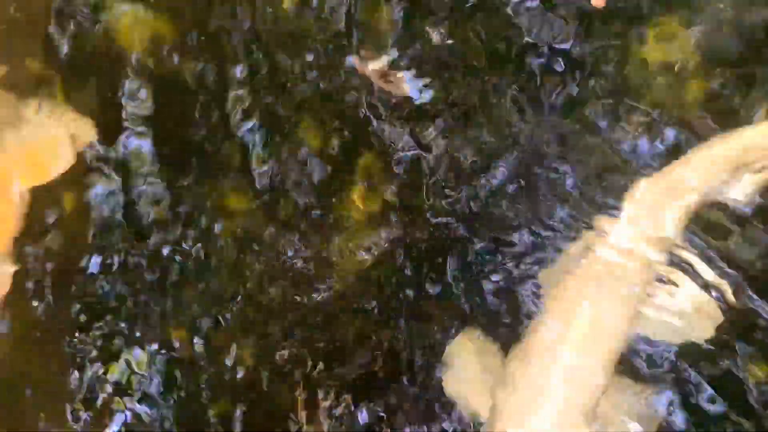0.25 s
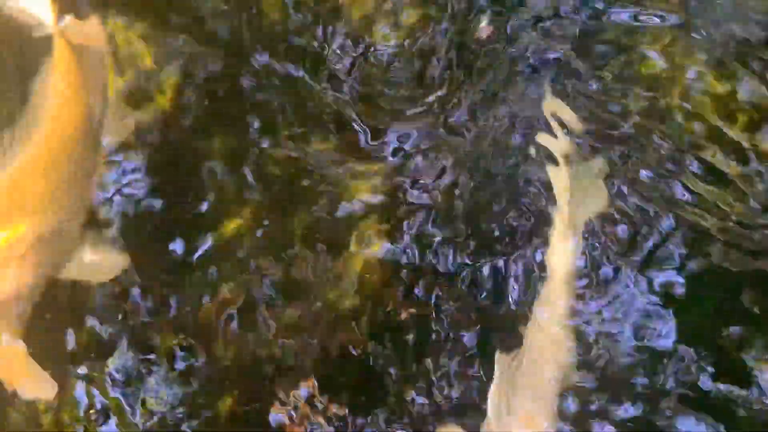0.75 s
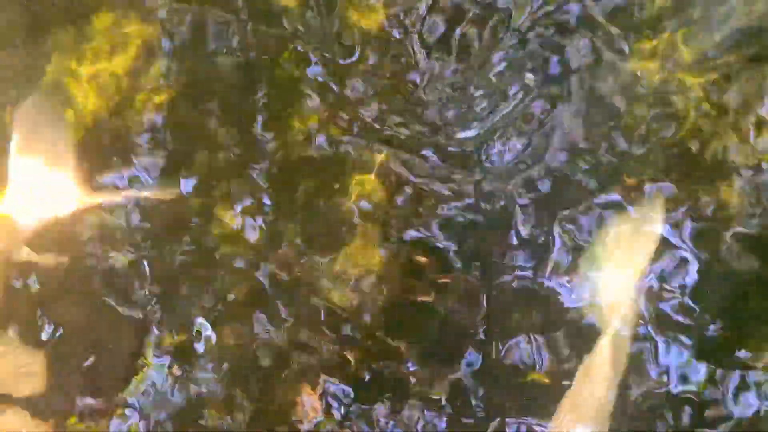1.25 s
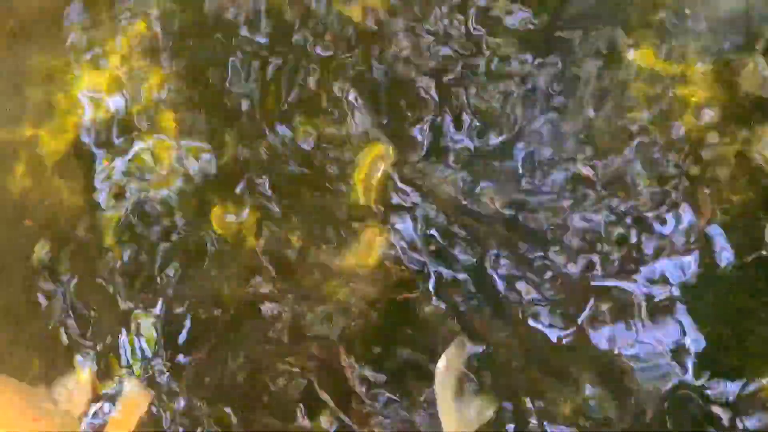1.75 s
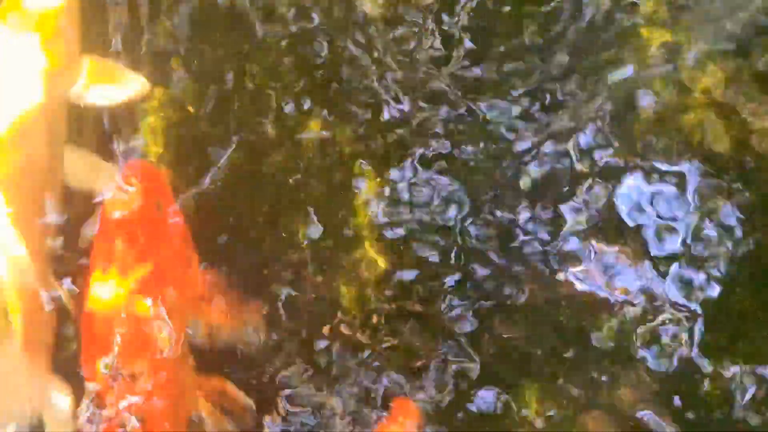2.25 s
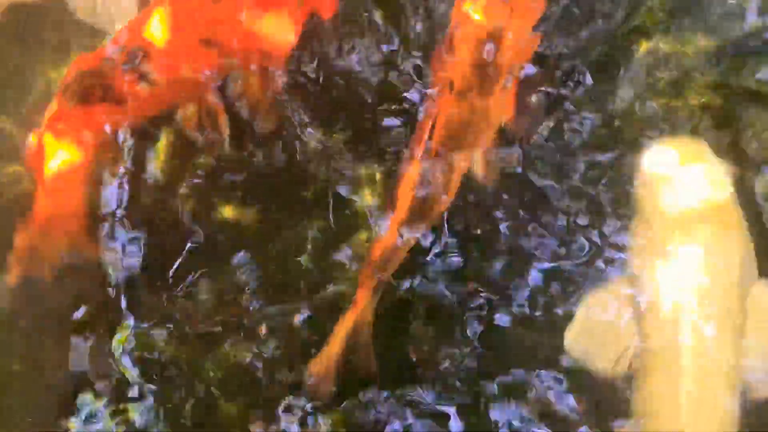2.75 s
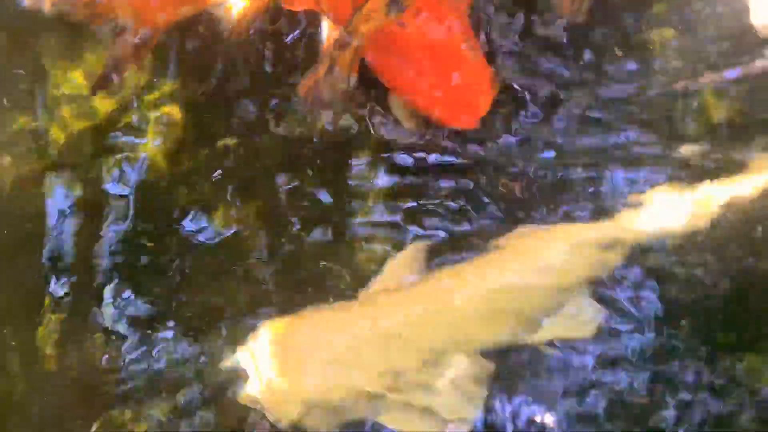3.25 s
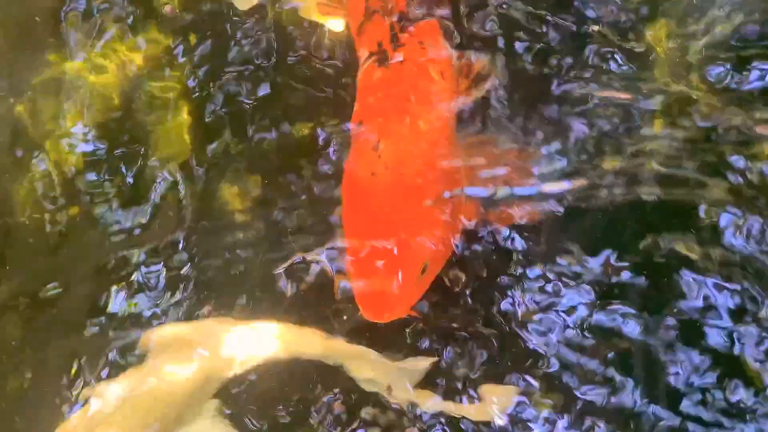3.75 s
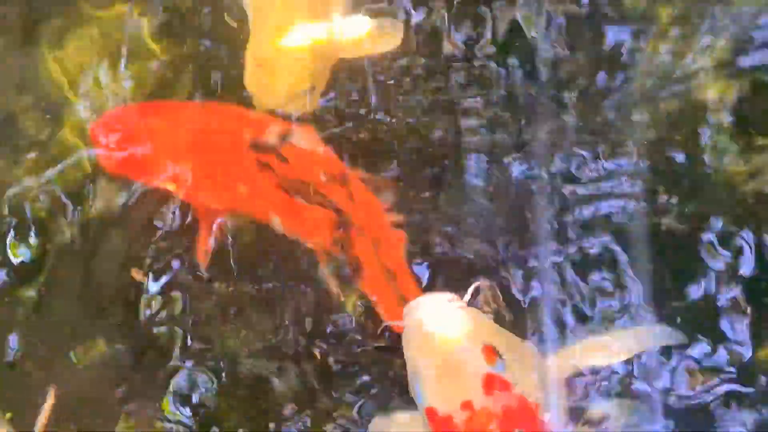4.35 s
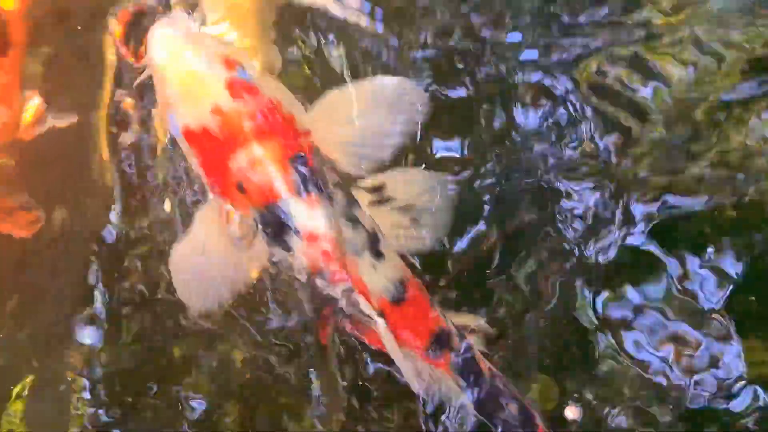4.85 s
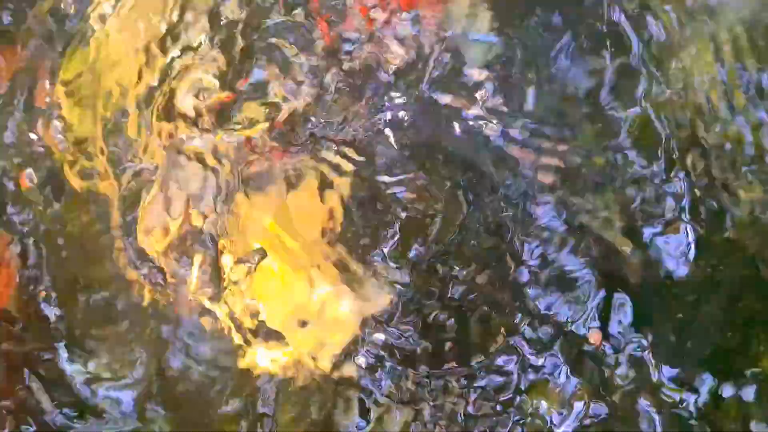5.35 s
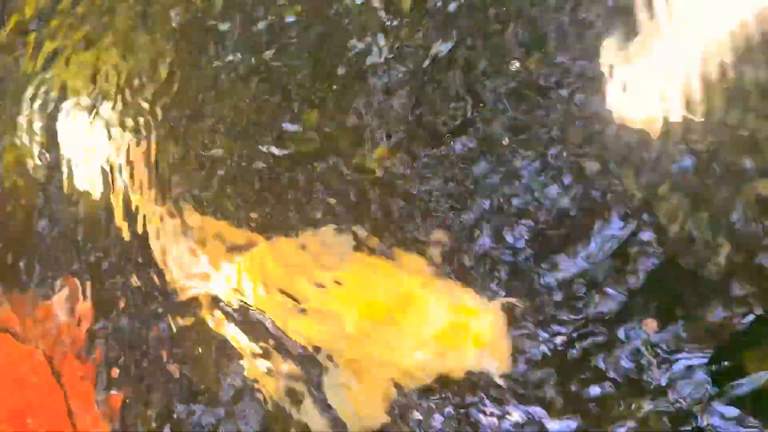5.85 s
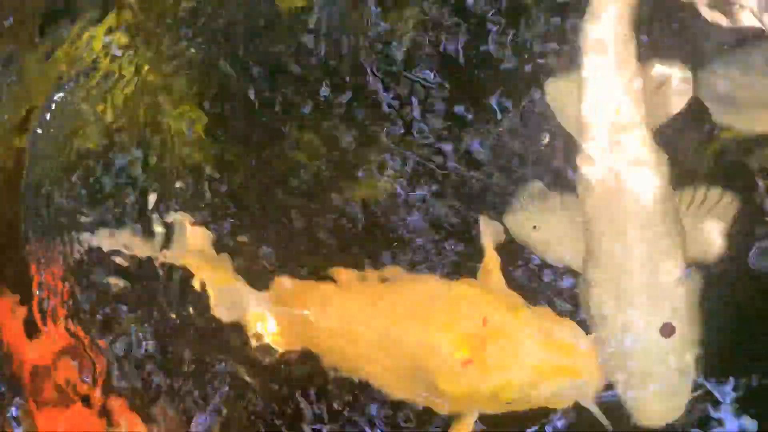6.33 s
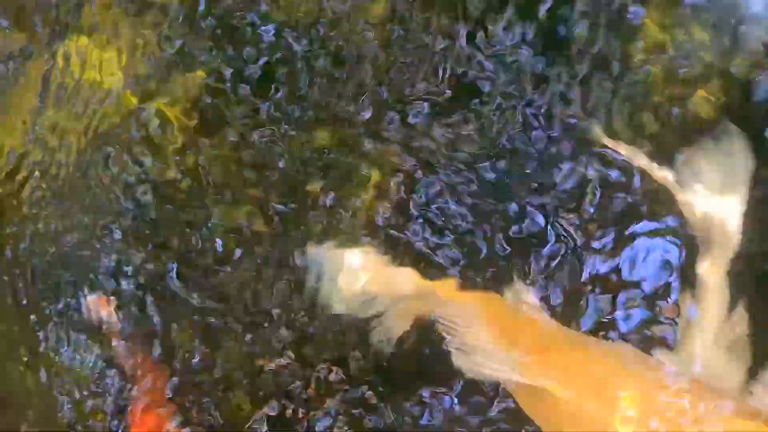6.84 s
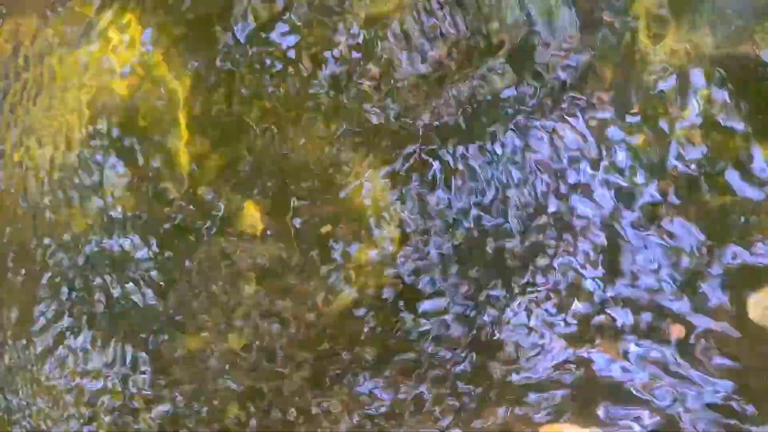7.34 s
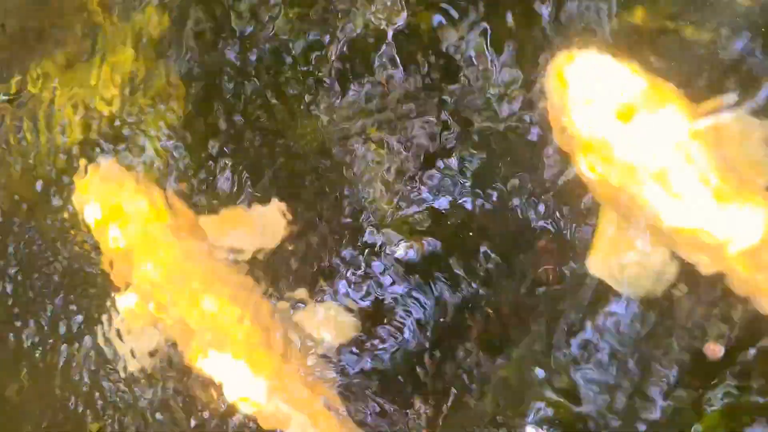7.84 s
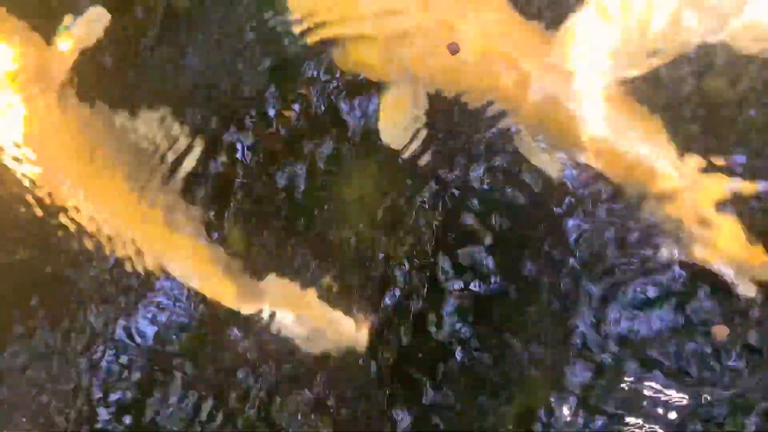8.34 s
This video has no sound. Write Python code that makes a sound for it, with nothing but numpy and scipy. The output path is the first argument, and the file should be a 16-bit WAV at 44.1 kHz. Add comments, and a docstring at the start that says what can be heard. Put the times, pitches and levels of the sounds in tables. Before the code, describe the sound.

Outdoors, close to the water, large fish suck at the surface with popping lips, rising slurps and short slaps. Fine droplets trickle steadily from the left, and small wavelets plip and spatter. The feeding comes in clusters, strongest around two seconds and again after seven, where one tail churns the water on the right. Soft garden air and a low distant motor stay underneath.

```python
"""Koi feed at the surface of a garden pond, close by: air trapped by mouths and fins rings as gliding sines,
lips and fins slap the water as filtered pulses, and crowds of small bubbles and spray make short splashes.
One tail thrashes near the end. Behind them water trickles in from the left as showers of ringing droplets,
wavelets lap and spatter, a hollow rings faintly under drips, and a distant motor drones in noisy garden air."""
import sys
import numpy as np
from scipy import signal
from scipy.fft import rfft, irfft, next_fast_len
from scipy.io import wavfile
from scipy.ndimage import uniform_filter1d, map_coordinates

SR = 44100
rng = np.random.default_rng(int(sys.argv[2]) if len(sys.argv) > 2 else 0)


def to_wav(sig):
    """Store sig (one row per channel, or 1-D mono) as 16-bit WAV at the path in sys.argv[1].

    Samples outside -1..1 are clipped; the rate is SR.
    """
    pcm = np.clip(np.atleast_2d(sig), -1, 1) * 32767
    pcm = np.round(pcm).astype(np.int16)
    wavfile.write(sys.argv[1], SR, pcm.T)  # frames by channels


N = 378819
TIME = np.arange(N) / SR

# a mouth pops open with a smack and its cavity rings: t/s, f/Hz, ring peak level/dB, smack peak level/dB
MOUTH_POPS = [(.248, 1150, -34, -34), (.679, 810, -35, -40), (1.768, 1370, -25, -23),
              (1.9625, 900, -8.5, -17), (2.027, 1450, -29, -23), (4.2502, 880, -24, -21),
              (7.2055, 480, -29, -18), (7.378, 2750, -21, -22), (7.466, 720, -16, -20),
              (7.859, 820, -30, -33), (7.997, 1800, -27, -36), (8.1558, 760, -27, -17)]
# air sucked in with water rings upwards: t/s, f/Hz, peak level/dB, rise/octaves
SUCTIONS = [(1.018, 1350, -39, 1.0), (1.848, 755, -21.5, .15), (1.884, 1150, -22.5, 1.0),
            (2.102, 325, -25.5, .35), (2.117, 800, -31.5, 1.2), (2.21, 960, -28, .45),
            (3.529, 840, -45, .4), (5.1, 900, -32, 1.0), (5.189, 900, -33, .35), (5.512, 470, -37, .2),
            (6.984, 460, -35, .25), (7.477, 680, -29, .35), (8.16, 525, -20.5, .5)]
# a hollow in the surface closes behind a fish with a slow note that rises, or falls while the hollow widens:
# t/s, start f/Hz, end f/Hz, peak level/dB
CLOSING_HOLLOWS = [(.475, 520, 2000, -48), (1.858, 800, 300, -38), (1.95, 900, 280, -33),
                   (2.162, 380, 720, -44), (2.505, 420, 1200, -42), (5.52, 420, 1300, -44),
                   (7.02, 540, 1800, -49), (7.236, 380, 800, -34), (7.678, 1000, 2200, -40)]
# a fin slaps the surface and splashes: t/s, splash length/s, churn rms level/dB, dull above f/Hz
FIN_SLAPS = [(1.012, .035, -43, 4400), (1.857, .035, -31, 2600), (1.979, .008, -38, 4300),
             (4.2505, .012, -41, 3600), (4.976, .02, -44, 1600), (4.99, .02, -38, 1700),
             (5.006, .04, -39, 1900), (5.281, .02, -47, 6000), (5.427, .012, -42, 2600),
             (5.437, .03, -46, 2200), (5.555, .02, -46, 2600), (5.628, .01, -49, 1780),
             (7.226, .016, -40, 3500), (7.768, .025, -44, 3200)]
SLURP_LIFE_S, SWIRL_S, SWEEP_S = .025, .066, .05   # slurp: to -20 dB at the middle pitch


def from_db(db):
    """Amplitude is ten to the power of level over 20."""
    return 10 ** (np.asarray(db) / 20)


def rms_one(x):
    """Dividing by the root mean square gives unit rms."""
    return x / np.sqrt(np.mean(x ** 2) + 1e-20)


def in_time(rows):
    """Linear interpolation turns timed rows into continuous curves."""
    s, *columns = np.transpose(rows)
    return [np.interp(TIME, s, column) for column in columns]


def at_hz(points, hz):
    """A spectrum in dB is interpolated along logarithmic frequency."""
    table_hz, table_db = np.array(points).T
    return np.interp(np.log(hz + 1e-3), np.log(table_hz), table_db)


def add(track, s, sound):
    """Superposition: a sound starting at s seconds sums into the track."""
    start = max(round(s * SR), 0)
    track[start:start + len(sound)] += sound[:max(N - start, 0)]


def butter(x, hz, kind, order=2):
    """A Butterworth filter has a maximally flat passband."""
    sos = signal.butter(order, np.minimum(hz, SR / 2 - 1), kind, fs=SR, output="sos")
    return signal.sosfilt(sos, x)


def swell(t, life, attack_s, hold):
    """Exponential build-up, then damping to -20 dB at t = life; hold > 1 keeps it up longer."""
    return (1 - np.exp(-t / attack_s)) * from_db(-20 * (t / life) ** hold)


def ring(clicks, hz, t60):
    """Damped resonance: each click excites a two-pole resonator that loses 60 dB in t60 seconds."""
    radius, angle = from_db(-60 / (t60 * SR)), 2 * np.pi * hz / SR
    # the tiny offset keeps the filter off denormal numbers
    return signal.lfilter([1, 0, -1], [1, -2 * radius * np.cos(angle), radius ** 2], clicks + 1e-18)


def droplets(spectrum, per_s, cycles, size_db, clump_db, clump_hz, scatter_ms, count=30):
    """Random impulses excite bands of tiny resonant bubbles, clumped in time by size; stereo, rms 1."""
    out = 0
    # neighbouring pitches share part of their clumping
    clumps = uniform_filter1d(rng.standard_normal((count, 2000)), size=3, axis=0) * np.sqrt(3)
    for hz, clump in zip(np.geomspace(spectrum[0][0], spectrum[-1][0], count), clumps):
        when, big, sign, where, side = rng.random((4000, 5))[:int(per_s * N / SR / count)].T
        at = (when * N).astype(int)
        crowd = np.interp(at / SR * clump_hz, np.arange(len(clump)), np.minimum(clump, 2))
        level_db = clump_db * crowd - size_db * np.log(np.maximum(big, .03))
        size = from_db(level_db) * np.sign(sign - .5)
        lag = ((2 * where - 1) * scatter_ms * SR / 1000).astype(int)
        lean = 2 ** (side - .5)   # left against right
        left = np.bincount(at, size * lean, N)
        right = np.bincount((at + lag) % N, size / lean, N)
        band = rms_one(ring(np.array([left, right]), hz, cycles / hz))
        # bands evenly spaced in log frequency widen with hz
        out = out + from_db(at_hz(spectrum, hz)) * np.sqrt(hz) * band
    return rms_one(out)


def trickle(surge_db=2.9, surge_hz=13):
    """Falling water excites many small bubbles: inflow patters in little surges, with lone drips ringing."""
    # colour of the trickle: f/Hz, relative level per Hz/dB
    trickle_colour = [(600, -1), (900, 4), (1400, 4), (3000, 1.5), (5000, -4.5), (8000, -9.5), (12000, -10),
                      (15500, -26)]
    patter_db, drips_db = -55.2, -60   # rms
    patter = droplets(trickle_colour, per_s=3000, cycles=30, size_db=2.2, clump_db=6, clump_hz=32,
                      scatter_ms=.14, count=28)
    drips = droplets(trickle_colour, per_s=140, cycles=80, size_db=3.5, clump_db=2, clump_hz=8,
                     scatter_ms=.14, count=18)
    surge = from_db(surge_db * rms_one(butter(rng.standard_normal(N), surge_hz, "low")))
    return from_db(patter_db) * rms_one(patter * surge) + from_db(drips_db) * drips


def from_left(x):
    """Interaural delay: sound from the inflow's side reaches the right ear later."""
    delay_ms = .28
    return np.array([x[0], np.roll(x[1], round(delay_ms * SR / 1000))])


def garden_air(spread_hz=1100, bass_width=0.32):
    """Shaped noise: low outdoor rumble under the smooth hiss of far water, less coherent in the treble."""
    # colour of the air: f/Hz, relative level per Hz/dB
    air_colour = [(25, -14), (42, 4.5), (85, -2), (160, -7.5), (700, -15), (1100, -26.5), (3000, -27),
                  (6000, -33), (16000, -34.5)]
    air_db = -55.2   # rms
    size = next_fast_len(N)
    hz = np.arange(size // 2 + 1) * SR / size
    mid, side = rfft(rng.standard_normal((2, size))) * from_db(at_hz(air_colour, hz))
    width = bass_width + (1 - bass_width) * hz ** 2 / (hz ** 2 + spread_hz ** 2)
    noise = irfft(mid + width * side * [[1], [-1]], size)[:, :N]
    return from_db(air_db) * rms_one(noise)


def motor(waver_hz=9):
    """A carrier modulated by slow complex noise: a far drone whose strength and phase waver on the way."""
    # distant motor: t/s, f/Hz, level/dB
    motor_course = [(0, 82, -56), (.5, 82, -54), (2.8, 79, -56), (4.6, 84, -61), (6.1, 94, -55),
                    (8.6, 98, -59)]
    pitch, level_db = in_time(motor_course)
    waver = butter(rng.standard_normal(N) + 1j * rng.standard_normal(N), waver_hz, "low")
    drone = np.real(waver * np.exp(2j * np.pi * np.cumsum(pitch) / SR))
    return from_db(level_db) * rms_one(drone) * from_db([[-.8], [.8]])   # a little stronger on the right


def bubble(hz, glide, life, attack_cycles=1.3):
    """A pulsating air cavity: a gliding complex sine of height 1 that builds up and is damped away."""
    t = TIME[:int(2 * life * SR)]
    pitch = hz * 2 ** (glide * np.minimum(t / life, 1) ** 1.3)   # glide in octaves, done at t = life
    shape = swell(t, life, attack_s=attack_cycles / hz, hold=1.5)
    return shape / shape.max() * np.exp(2j * np.pi * np.cumsum(pitch) / SR)


def churn(length, centre_hz, per_s, spread_octaves=.58, cycles=9, size_db=4.5, lateness=1.3, rise=0.29):
    """Superposed small bubbles, mostly rising, thickest early or, with more lateness, midway; rms 1 over length."""
    out = np.zeros(SR // 2)
    draws = np.column_stack([rng.beta(lateness, 2.6, 200), rng.standard_normal((200, 3)).clip(-2, 2)])
    for when, high, big, fast in draws[:max(int(per_s * length), 2)]:
        hz = centre_hz * 2 ** (spread_octaves * high)
        life = cycles / np.sqrt(hz * centre_hz)   # larger bubbles ring longer
        note = bubble(hz, rise * (1 + fast), life).imag
        add(out, 1.4 * length * when, from_db(size_db * big) * note)
    return out * np.sqrt(length * SR / np.sum(out ** 2))


def laps():
    """Bubble resonance: wavelets close over pairs of like bubbles, at random times and pitches."""
    laps_per_s, low_hz, range_octaves, strongest_db = 9, 650, 1.9, -51.5   # level: rms
    out = np.zeros(N)
    for when, high, big in rng.random((200, 3))[:int(laps_per_s * N / SR)]:
        hz = low_hz * 2 ** (range_octaves * high)
        # the low rate leaves churn's least number, two bubbles
        notes = churn(.02, hz, per_s=1, spread_octaves=.1, cycles=22, rise=.1)
        add(out, when * N / SR, from_db(strongest_db) * big * notes)
    return out


def spatters(spread_db=4):
    """Powers of incoherent bursts add: wavelets throw faint, decaying spray at random moments."""
    per_s, weakest_db, decay_s = 9, -59, .02   # decay to -20 dB
    power, t = np.zeros(N), TIME[:SR // 10]
    for when, big in rng.random((200, 2))[:int(per_s * N / SR)]:
        start_db = weakest_db - spread_db * np.log(max(big, .08))
        add(power, when * N / SR, from_db(start_db - 20 * t / decay_s) ** 2)
    return power


def spray_power(length, attack_share):
    """Energy envelope of a burst of spray and of the drops that rain back after it."""
    fallback_db, fallback_s = -16.5, .34   # under a burst as long as a sweep; time to -20 dB
    t = TIME[:SR // 2]
    burst = swell(t, 1.3 * length, attack_share * length, hold=2) ** 2
    rain = swell(t, fallback_s, length, hold=1)
    fallback = (from_db(fallback_db) * rain) ** 2 * length / SWEEP_S
    return (burst + fallback) * length * SR / burst.sum()


def splashes(slap_attack=.05, sweep_attack=.18):
    """Entrained air rings as churn and thrown drops as spray; slaps are abrupt, sweeps swell, lips only stir."""
    # colour of the spray: f/Hz, relative level per Hz/dB
    spray_colour = [(2000, -12), (2900, 0), (4000, 2), (5000, -6), (7000, -7.5), (12000, -10), (15500, -21)]
    # a tail or back sweeps through the surface: t/s, churn rms level/dB, spray rms level/dB
    body_sweeps = [(2.118, -43, -54), (5.305, -49, -43), (5.44, -49, -48), (7.285, -45, -55),
                   (7.337, -33.5, -44), (7.379, -35, -34), (7.425, -36, -48), (7.46, -35, -35),
                   (7.512, -41, -45), (7.635, -47, -51), (8.015, -45, -56), (8.205, -44, -50)]
    # stirred water gurgles with a few larger bubbles: t/s, length/s, rms level/dB, f/Hz
    stirred_water = [(2.04, .14, -48, 780), (7.335, .16, -38.5, 690), (7.62, .2, -48, 750)]
    even_spray_hz, spray_db_per_octave = 5500, 7   # a slap this bright throws as much spray as churn
    slap_lead_s, slap_churn_hz, sweep_churn_hz = .004, 520, 2050   # water stirs just before the fin lands
    lips_lead_s, lips_under_smack_db = .014, -25   # the lips stir the surface just before each gulp
    stir_db = -13   # small bubbles round a slurp or swirl, against its peak
    gurgles_per_s, gurgle_octaves = 550, .42   # bubbles per second, spread
    gurgle, spray = np.zeros(N), spatters()
    for s, length, churn_db, dull_hz in FIN_SLAPS:
        centre_hz = np.sqrt(slap_churn_hz * dull_hz)   # midway in octaves
        burst = churn(length, centre_hz, per_s=1200, spread_octaves=.6, cycles=7)
        spray_db = churn_db + spray_db_per_octave * np.log2(dull_hz / even_spray_hz)
        add(gurgle, s - slap_lead_s, from_db(churn_db) * burst)
        add(spray, s - slap_lead_s, from_db(spray_db) ** 2 * spray_power(length, slap_attack))
    for s, churn_db, spray_db in body_sweeps:
        wash = churn(SWEEP_S, sweep_churn_hz, per_s=1500, spread_octaves=.68, size_db=4.6, lateness=1.7)
        add(gurgle, s, from_db(churn_db) * wash)
        add(spray, s, from_db(spray_db) ** 2 * spray_power(SWEEP_S, sweep_attack))
    for s, length, level_db, hz in stirred_water:
        add(gurgle, s, from_db(level_db) * churn(length, hz, gurgles_per_s, gurgle_octaves))
    for s, hz, _, smack_db in MOUTH_POPS:
        stir = churn(lips_lead_s, hz, gurgles_per_s)
        add(gurgle, s - lips_lead_s, from_db(smack_db + lips_under_smack_db) * stir)
    for s, hz, peak_db, _ in SUCTIONS:
        add(gurgle, s, from_db(peak_db + stir_db) * churn(SLURP_LIFE_S, hz, gurgles_per_s))
    for s, _, end_hz, peak_db in CLOSING_HOLLOWS:
        add(gurgle, s, from_db(peak_db + stir_db) * churn(SWIRL_S, end_hz, gurgles_per_s))
    crackle = droplets(spray_colour, per_s=1400, cycles=10, size_db=4.6, clump_db=3.8, clump_hz=70,
                       scatter_ms=.07, count=18)
    return gurgle + np.sqrt(spray) * crackle * from_db([[-1.1], [1.1]])


def life_at(hz, middle_life_s):
    """Damping falls with cavity size: larger, lower cavities ring longer, by a power law."""
    middle_hz, life_power = 800, .3
    return middle_life_s * (middle_hz / hz) ** life_power


def swirl(start_hz, end_hz):
    """Glide with random modulation: a ragged note of height about 1 that swells and fades."""
    roughness = .28
    part = np.linspace(0, 1, int(SWIRL_S * SR))
    slow_noise = butter(rng.standard_normal((2, len(part))), start_hz / 2, "low")
    sway, wobble = roughness * rms_one(slow_noise)
    pitch = start_hz * (end_hz / start_hz) ** part
    tone = np.exp(2j * np.pi * np.cumsum(pitch) / SR)
    return np.sin(np.pi * part) * (1 + sway + 1j * wobble) * tone


def bubbles(flutter=.17, flutter_hz=170):
    """Cavity resonance rises as a bubble nears the surface, falls as a mouth widens round it, and quivers."""
    # loose air pockets at nearly steady pitch, the largest as dull thuds:
    # t/s, f/Hz, peak level/dB, life to -20 dB/s
    air_pockets = [(.248, 850, -39, .015), (.72, 140, -44, .04), (2.602, 1370, -42, .016),
                   (4.253, 1500, -22, .004), (4.2605, 560, -24, .013), (4.3, 85, -41, .09),
                   (4.992, 400, -37, .04), (5.022, 1150, -33, .012), (5.171, 1320, -35, .011),
                   (5.281, 505, -35, .07), (5.316, 1560, -26.5, .021), (6.831, 845, -42, .02),
                   (7.207, 215, -34, .015), (7.222, 310, -31, .012), (7.423, 650, -28, .022),
                   (7.526, 2200, -20.5, .007), (7.541, 1900, -28, .014), (8.008, 520, -41, .04),
                   (8.052, 2080, -29, .012), (8.163, 1780, -29.5, .0164), (8.239, 1660, -36, .02)]
    gulp_life_s, gulp_fall_octaves = .0125, .38   # life to -20 dB at the middle pitch
    slurp_attack_cycles = 2.4   # suction builds up more slowly than a pop
    plop_rise_octaves = .06
    out = np.zeros(N, complex)
    for s, hz, peak_db, _ in MOUTH_POPS:
        add(out, s, from_db(peak_db) * bubble(hz, -gulp_fall_octaves, life_at(hz, gulp_life_s)))
    for s, hz, peak_db, rise in SUCTIONS:
        slurp = bubble(hz, rise, life_at(hz, SLURP_LIFE_S), slurp_attack_cycles)
        add(out, s, from_db(peak_db) * slurp)
    for s, start_hz, end_hz, peak_db in CLOSING_HOLLOWS:
        add(out, s, from_db(peak_db) * swirl(start_hz, end_hz))
    for s, hz, peak_db, life in air_pockets:
        add(out, s, from_db(peak_db) * bubble(hz, plop_rise_octaves, life))
    sway, wobble = flutter * rms_one(butter(rng.standard_normal((2, N)), flutter_hz, "low"))
    return np.imag(out * (1 + sway + 1j * wobble))


def smacks(crack_s=0.00036, patter_s=0.009, patter_db=-14, low_hz=380, snap_db=-19):
    """Impact radiation: lips or a fin push sharply on the water, then milliseconds of patter as the film tears."""
    smack_over_ring = 2.2   # a smack is dull above this multiple of the mouth's pitch
    slap_over_churn_db = 19
    out, t = np.zeros(N), np.arange(SR // 30) / SR
    lips = [(s, smack_db, smack_over_ring * hz) for s, hz, _, smack_db in MOUTH_POPS]
    fins = [(s, churn_db + slap_over_churn_db, dull_hz) for s, _, churn_db, dull_hz in FIN_SLAPS]
    for s, peak_db, dull_hz in lips + fins:
        tear = rng.standard_normal(len(t)) * from_db(patter_db) * np.exp(-t / patter_s)
        push = np.exp(-t / crack_s) * np.cos(np.pi * dull_hz * t) + tear
        dulled = butter(push, dull_hz, "low", order=4)
        smack = butter(dulled + from_db(snap_db) * push, low_hz, "high")
        add(out, s, from_db(peak_db) * smack / np.abs(smack).max())
    return out


def ticks():
    """Impulse and decaying noise through one band-pass: a thrown drop lands with a tick and a short fizz."""
    # landing drops: t/s, f/Hz, peak level/dB
    landing_drops = [(.957, 3900, -26), (1.012, 3700, -24), (1.9415, 4500, -28), (1.9785, 4100, -16.5),
                     (4.2503, 8000, -25), (7.466, 6000, -17), (7.476, 9500, -20), (7.647, 9500, -24)]
    band_ratio, fizz_db, fizz_s = 1.25, -21.02, .03   # band edge over pitch; time to -20 dB
    out, t = np.zeros(N), TIME[:SR // 10]
    for s, hz, peak_db in landing_drops:
        fizz = rng.standard_normal(len(t)) * from_db(fizz_db - 20 * t / fizz_s)
        impact = (t == 0) + fizz
        tick = butter(impact, [hz / band_ratio, hz * band_ratio], "band", order=1)
        add(out, s, from_db(peak_db) * tick / np.abs(tick).max())
    return out


def hollow():
    """Cavity resonance: for a spell, drips fall into a hollow at the pond's edge and make it ring faintly."""
    pitch_hz, t60_s, drips_per_s, level_db = 725, .16, 18, -62.5   # rms before the spell's envelope
    centre_s, spell_s = 3.3, .8
    drips = (rng.random(N) < drips_per_s / SR) * rng.standard_normal(N)
    spell = np.exp(-((TIME - centre_s) / spell_s) ** 2)
    return from_db(level_db) * spell * rms_one(ring(drips, pitch_hz, t60_s))


def placed(x):
    """Interaural time and level differences follow the busiest fish's bearing."""
    # where the busiest fish is: t/s, bearing (-1 left to 1 right)
    fish_path = [(1.0, .45), (1.77, -.18), (4.25, -.16), (6.99, -.55), (7.2, .85), (7.55, .85), (7.7, -.15)]
    delay_ms, shade_db = .46, 3.2   # between the sides, for a fish far to one side
    bearing, = in_time(fish_path)
    shift = bearing * delay_ms * SR / 2000   # half the delay on each side, in samples
    ears = []
    for ear, side in zip(x, (1, -1)):
        delayed = map_coordinates(ear, [np.arange(N) - side * shift], order=3)
        ears.append(delayed * from_db(-side * bearing * shade_db / 2))
    return np.array(ears)


def rim_echoes(x, spread_hz=700):
    """Diffuse reverberation: stones round the pond scatter a short tail, alike on both sides in the bass."""
    # echoes off the pond's rim: f/Hz, level/dB
    rim_colour = [(200, -11), (800, -14.5), (2000, -9), (15000, -6.5)]
    rim_t60_s = .17
    t = TIME[:SR // 3]
    mid, side = rng.standard_normal((2, len(t))) * from_db(-60 * t / rim_t60_s) * (t > .003)
    tail = mid + butter(side, spread_hz, "high", order=1) * [[1], [-1]]
    size = next_fast_len(N + len(t))
    hz = np.arange(size // 2 + 1) * SR / size
    colour = from_db(at_hz(rim_colour, hz)) / np.linalg.norm(mid)
    return irfft(rfft(x, size) * rfft(tail, size) * colour, size)[:, :N]


def scene():
    """Superposition of fish, trickle and laps with their echoes, over the garden's background."""
    fish = placed(bubbles() + smacks() + splashes() + ticks())   # wavelet spatters share the bearing
    water = fish + from_left(trickle() + laps() + hollow())
    return water + rim_echoes(water) + from_left(garden_air()) + motor()


def record(dry):
    """Band limiting: an elliptic low-pass cuts the top steeply."""
    cutoff_hz = 15900
    sos = signal.ellip(10, .2, 70, cutoff_hz, fs=SR, output="sos")   # ripple and rejection in dB
    return signal.sosfilt(sos, dry)


dry = scene()
out = record(dry)
to_wav(out)
```